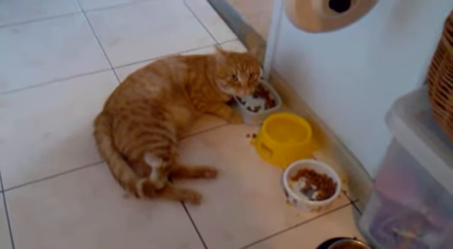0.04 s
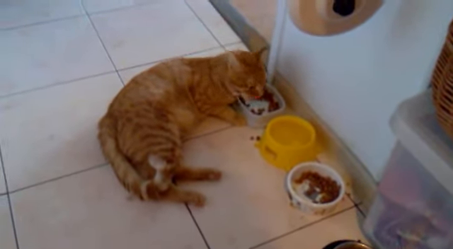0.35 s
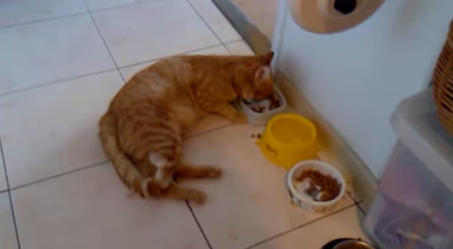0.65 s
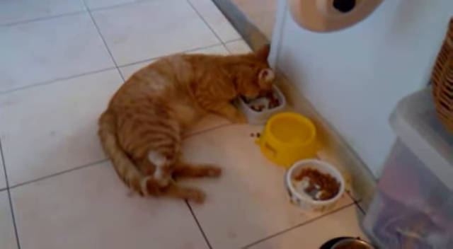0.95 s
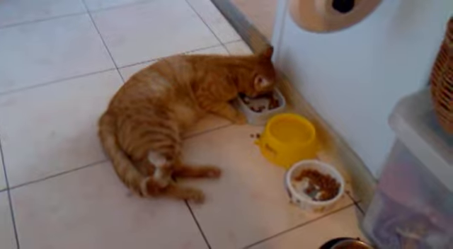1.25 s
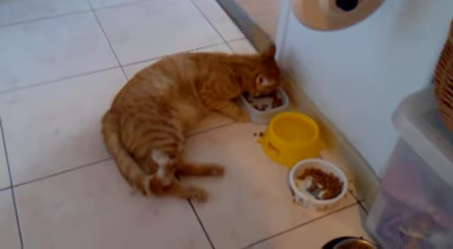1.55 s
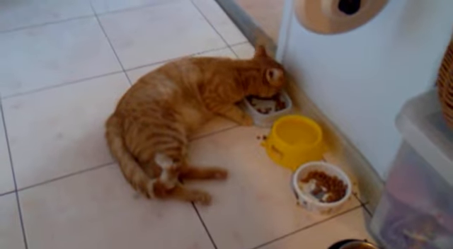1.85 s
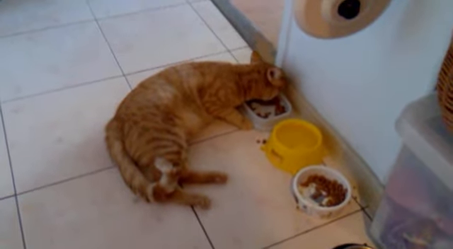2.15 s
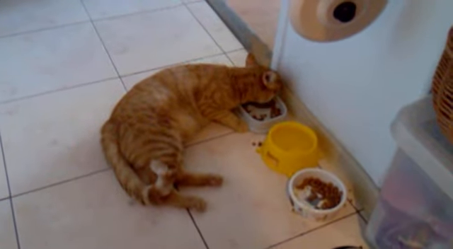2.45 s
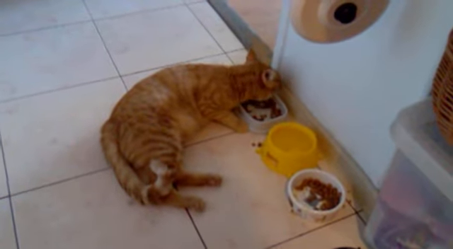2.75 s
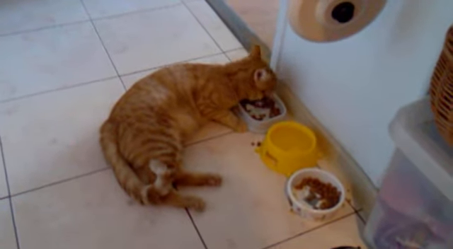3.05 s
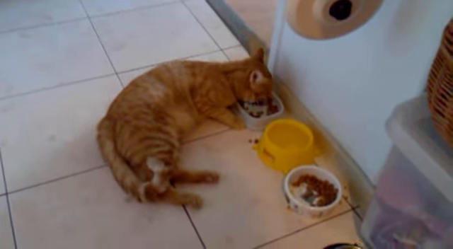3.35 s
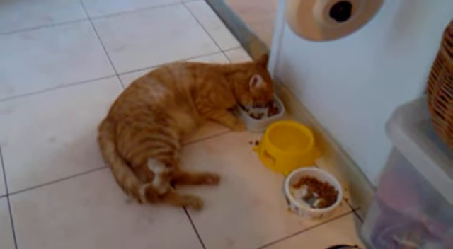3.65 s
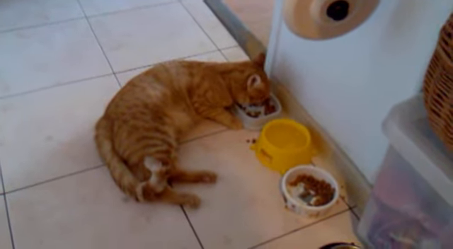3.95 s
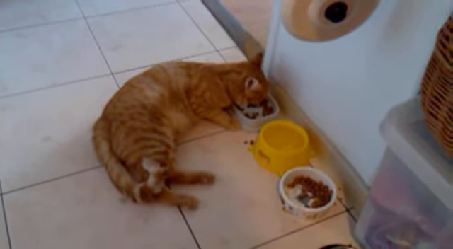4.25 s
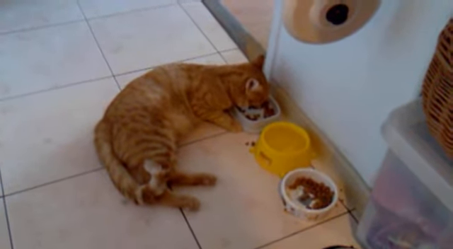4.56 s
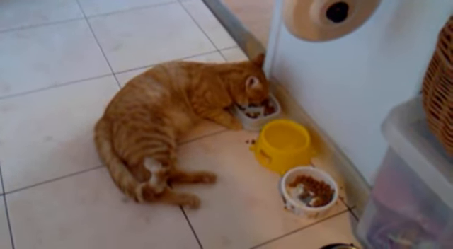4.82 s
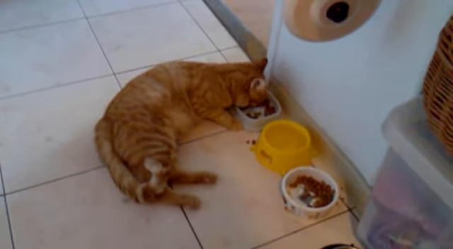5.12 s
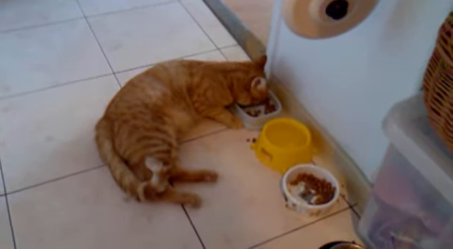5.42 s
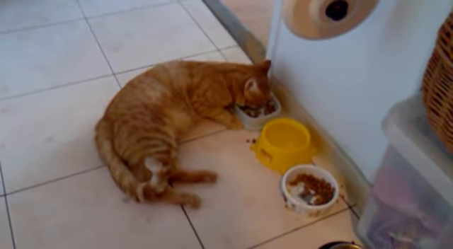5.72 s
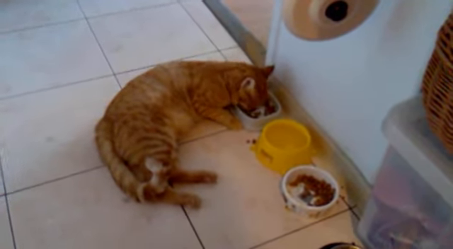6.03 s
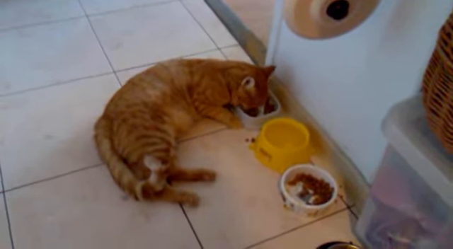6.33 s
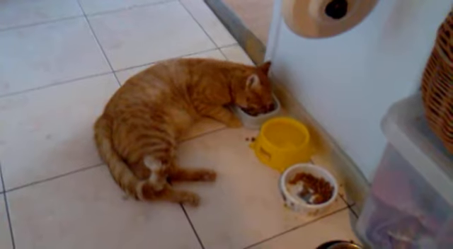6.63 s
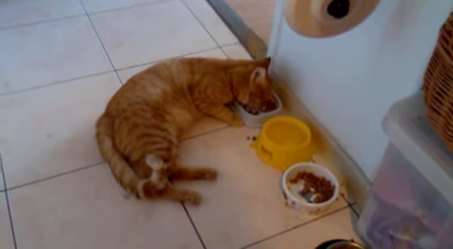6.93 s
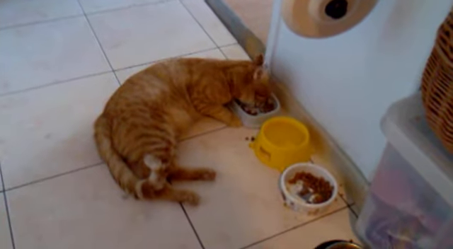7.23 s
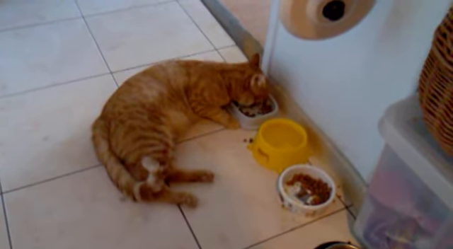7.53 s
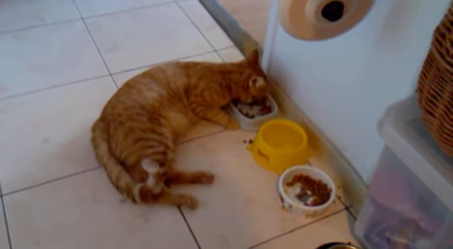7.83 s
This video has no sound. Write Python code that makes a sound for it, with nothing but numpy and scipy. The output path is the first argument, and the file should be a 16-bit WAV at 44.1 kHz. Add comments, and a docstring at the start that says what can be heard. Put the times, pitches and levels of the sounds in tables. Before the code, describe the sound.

Soft hiss and a faint low rumble from a hand-held camera run throughout, in a quiet tiled kitchen. At about 1.5 seconds the hand shifts its grip with a close rustle and a short scraping tick. At 2 seconds one sharp knock with a low thud strikes right at the microphone, by far the loudest sound; it briefly overloads, and the hiss swells and sinks back. Another small scrape follows near 2.7 seconds. From about 3 seconds, a cat a step or two away crunches dry kibble in faint, crisp, irregular ticks, clustered around 3 and 4.5 seconds, each with a short room echo. From 5.5 to 7.4 seconds, light dull tocks of kibble against a plastic bowl mix with more bites. Two thin, high squeaks barely show near 0.3 and 5.5 seconds. Soft handling rustle returns near the end.

```python
"""A tiled kitchen, a hand-held camera a step or two from a cat eating dry food on the floor.
Kibble cracks between its teeth and taps the plastic bowl; the room answers each tick. Up close, the
hand rumbles and rustles on the camera, with two short scraping ticks as it shifts its grip.
Two thin squeaks barely show in the hiss. Once something knocks sharply right at the microphone
and overloads it; the hiss swells and sinks back."""
import sys
import numpy as np
from scipy import signal
from scipy.fft import rfft, irfft
from scipy.io import wavfile
from scipy.ndimage import uniform_filter1d

SR = 44100
rng = np.random.default_rng(int(sys.argv[2]) if len(sys.argv) > 2 else 0)


def bounce(signal):
    """Save signal as a 16-bit WAV file at the path given by the first command-line argument."""
    frames = np.transpose(np.atleast_2d(signal))
    limited = np.clip(frames, -1, 1)
    pcm = np.round(limited * 32767).astype(np.int16)
    wavfile.write(sys.argv[1], SR, pcm)


N = 351962
TIME = np.arange(N) / SR


def amp(db):
    """Decibels to gain."""
    return 10 ** (np.asarray(db) / 20)


def read(table, hz):
    """Interpolates a table on a log-frequency axis."""
    table_hz, value = np.transpose(table)
    return np.interp(np.log(hz + 1), np.log(table_hz + 1), value)


def add(mix, start_s, sound):
    """Mixes a sound in at its start time."""
    part = mix[max(round(start_s * SR), 0):][:len(sound)]
    part += sound[:len(part)]


def noise(colour):
    """Steady noise of one colour, rms 1."""
    hz = np.fft.rfftfreq(N, 1 / SR)
    x = irfft(rfft(rng.standard_normal(N)) * amp(read(colour, hz)), N)
    return x / np.sqrt(np.mean(x ** 2))


def snap(colour, tilt_db=0, size=1024):
    """A click of a given colour, tilted in dB per octave; its envelope peaks at 1."""
    hz = np.fft.rfftfreq(size, 1 / SR)
    db = read(colour, hz) + tilt_db * np.log2(np.clip(hz, 250, 5000) / 1000)
    log_gain = np.log(amp(np.r_[db, db[-2:0:-1]]))
    click = np.fft.ifft(np.exp(np.conj(signal.hilbert(log_gain)))).real  # minimum phase: a sudden start
    return click / abs(signal.hilbert(click)).max()


def mode(hz, cycles, size=1024):
    """One vibration that dies by 60 dB within some cycles."""
    turns = hz * np.arange(size) / SR
    return np.sin(2 * np.pi * turns) * np.exp(-np.log(1000) * turns / cycles)


def push(t, hz, decay_s):
    """A shove of pressure with a small rebound."""
    return -np.sin(2 * np.pi * hz * t) * np.exp(-t / decay_s)


def since_loud(x, threshold=0.25):
    """Seconds since the microphone last came near overload."""
    return TIME - np.maximum.accumulate(np.where(abs(x) > threshold, TIME, -np.inf))


# background hiss: (frequency [Hz], level [dB])
HISS_COLOUR = [(30, -23.5), (110, -6.5), (250, -5.5), (450, -2.5), (630, -5), (1000, -2.5), (1500, -4),
               (2000, -6), (2700, -13), (4200, -15.5), (8000, -16), (15500, -11.5)]
def hiss(mic, rest_db=-67, swell_db=19, sink_s=0.18):
    """The steady background is held down; a loud sound lets it up, and it sinks back."""
    return amp(rest_db + swell_db * np.exp(-since_loud(mic) / sink_s)) * noise(HISS_COLOUR)


def tremor(level_db=-62, wander_db=3, steps_per_s=8):
    """The hand at rest is never quite still: its level wanders at random."""
    wander = np.interp(TIME * steps_per_s, np.arange(256), rng.standard_normal(256))
    return amp(level_db + wander_db * wander)


# the hand shifts its grip: (time [s], length [s], level [dB])
GRIP_SHIFTS = [(1.514, 0.8, -54.5), (2.024, 0.36, -57.5), (2.633, 0.11, -56.5), (3.358, .14, -58.5),
               (6.421, .15, -60), (7.144, .8, -59.5)]
# handling noise, deep rumble and lighter rustle: (frequency [Hz], level [dB])
RUMBLE_COLOUR = [(8, -5), (20, -4.5), (35, -6.5), (52, 2.5), (66, -8), (85, -15.5), (130, -24.5),
                 (250, -29), (600, -51)]
RUSTLE_COLOUR = [(60, 5), (200, -7), (500, -6.5), (1400, -5), (3000, -16), (6000, -24), (10000, -30.5)]
def handling(rumble_db=-1, rustle_db=-10, attack_s=0.13, release_s=0.098):
    """The hand rumbles on the camera throughout; each shift of grip adds rumble and rustle."""
    grip = np.zeros(N)
    for s, length_s, db in GRIP_SHIFTS:
        build_up = np.clip((TIME - s) / attack_s, 0, 1)
        let_go = np.exp(-np.maximum(TIME - s - length_s, 0) / release_s)
        grip += amp(db) * build_up * let_go
    rumble = amp(rumble_db) * np.hypot(tremor(), grip) * noise(RUMBLE_COLOUR)
    return rumble + amp(rustle_db) * grip * noise(RUSTLE_COLOUR)


# faint thin squeaks: (time [s], length [s], pitch [Hz], level [dB])
SQUEAKS = [(0.337, 0.081, 3310, -79), (5.472, 0.082, 3410, -73.5)]
def squeaks(fall=0.03, waver=0.34, octave_db=1):
    """Two wavering partials, an octave apart, slide down a little."""
    out = np.zeros(N)
    for s, length_s, hz, db in SQUEAKS:
        sweep = np.linspace(-1, 1, int(length_s * SR))
        jitter = uniform_filter1d(rng.standard_normal(SR), size=60)[:len(sweep)]
        phase = 2 * np.pi * np.cumsum(hz * (1 - fall * sweep / 2 + waver * jitter)) / SR
        tone = np.sin(phase) + amp(octave_db) * np.sin(2 * phase)
        add(out, s, amp(db) * (1 - sweep ** 2) * tone)
    return out


# a dry, crisp click: (frequency [Hz], level [dB])
CRISP_COLOUR = [(200, -22), (800, -11), (1500, 1.5), (2500, 2.5), (4200, -3.5), (6500, -5.5), (8500, -18.5),
                (15000, -32.5)]
def crackle(level_db=-67, per_s=40, spread_db=3, reach_s=0.17):
    """Tiny stray clicks gather around the grip scrapes and the bites."""
    busy = sum(np.exp(-((TIME - s) / reach_s) ** 2) for s, *_ in SCRAPES_AND_BITES)
    hits = rng.random(N) < np.minimum(busy, 1) * per_s / SR
    sizes = amp(level_db + spread_db * np.minimum(rng.exponential(1, N), 3))
    ticks = signal.oaconvolve(hits * sizes, snap(CRISP_COLOUR))[:N]
    return ticks + 2 * near_walls(ticks)[:N]


def near_walls(x, spread_s=0.01, count=120):
    """Floor, cupboard and walls throw a cluster of early reflections back to the microphone."""
    response = np.zeros(SR)
    delays_s = np.minimum(rng.gamma(2, 1, count) * spread_s + 0.001, 0.5)
    response[(delays_s * SR).astype(int)] = rng.choice([-1, 1], count) / np.sqrt(count)
    return signal.fftconvolve(x, response)


# the tiled room dying away: (frequency [Hz], time to fall 60 dB [s])
KITCHEN_DECAY = [(100, 0.5), (500, 0.46), (1200, 0.32), (3000, 0.22), (7000, 0.12), (15000, 0.54)]
def kitchen_echo(x, rise_s, decay_speed=1):
    """The room's dense tail builds up, then each band dies at its own rate."""
    hz, t, bands = signal.stft(rng.standard_normal(SR), SR, nperseg=256)
    bands *= amp(-60 * decay_speed * t / read(KITCHEN_DECAY, hz)[:, None])
    tail = signal.istft(bands, SR, nperseg=256)[1][:SR]
    tail *= 1 - np.exp(-TIME[:SR] / rise_s)
    return signal.fftconvolve(x, tail / np.linalg.norm(tail))[:N]


def add_tick(mix, start_s, tick, early_db):
    """Each tick gets reflections of its own, as its source keeps moving."""
    add(mix, start_s, tick)
    add(mix, start_s, amp(early_db) * near_walls(tick))


def grit(decay_s=0.00696, per_s=700, strength=0.72, size=4096):
    """One impulse followed by a dying shower of smaller ones."""
    t = TIME[:size]
    shower = rng.choice([-1, 1], size) * (rng.random(size) < per_s / SR)
    return (t == 0) + strength * shower * np.exp(-t / decay_s)


# the hollow under a tick, by name: (resonance [Hz], level over the tick's ring [dB])
HOLLOWS = {"shut mouth": (550, 0), "open mouth": (1480, 2), "bowl": (930, -4.5)}
# Two short scrapes as the hand shifts its grip on the camera (the first two rows, whose hollow name
# only picks a resonance), then kibble breaking in the mouth or bowl:
# (time [s], level [dB], ring pitch [Hz], click boost [dB], hollow [name])
SCRAPES_AND_BITES = [(1.643, -55.5, 2440, 3, "open mouth"), (1.686, -48.5, 2350, -3.5, "open mouth"),
                     (1.742, -50, 2320, -0.5, "bowl"), (2.666, -51.5, 3086, 3.5, "shut mouth"),
                     (2.682, -46, 2890, -2, "shut mouth"), (2.908, -50.5, 2310, -3, "bowl"),
                     (2.9405, -50.5, 3596, -1, "bowl"), (3.162, -46.5, 4033, 1, "bowl"),
                     (3.171, -51.5, 2600, 2, "bowl"), (4.118, -50, 3220, -12, "open mouth"),
                     (4.405, -51, 2930, 0.5, "open mouth"), (4.444, -42.5, 2800, -6, "open mouth"),
                     (4.7376, -49, 2800, -8, "shut mouth"), (4.7953, -52, 2476, -2, "shut mouth"),
                     (5.766, -47, 2330, -10, "bowl"), (6.275, -49, 2950, 1.5, "bowl"),
                     (6.573, -52, 2230, -6, "bowl"), (6.771, -49, 2870, -13, "bowl"),
                     (7.258, -44.5, 2360, -8, "bowl")]
def scrapes_and_bites(ring_db=-6, click_db=1, spread=0.068):
    """The grip scrapes, then kibble splinters: gritty ticks ring at two close pitches over a hollow."""
    out = np.zeros(N)
    for s, db, ring_hz, boost_db, hollow_name in SCRAPES_AND_BITES:
        ring = mode(ring_hz * (1 - spread), cycles=15.4) - mode(ring_hz * (1 + spread), cycles=23)
        hollow_hz, hollow_db = HOLLOWS[hollow_name]
        hollow = amp(hollow_db) * mode(hollow_hz, cycles=12)
        click = amp(click_db + boost_db) * snap(CRISP_COLOUR)
        grain = amp(ring_db) * (ring + hollow) + click
        add_tick(out, s, amp(db) * signal.fftconvolve(grit(), grain), early_db=2)
    return out


# the hand bumps the camera: (time [s], level [dB])
HAND_BUMPS = [(1.688, -43), (1.995, -43), (2.034, -29), (2.073, -25.5), (2.092, -30.5), (3.262, -50),
              (3.492, -48.5)]
def bumps():
    """Each soft bump reaches the microphone as a low thud."""
    out = np.zeros(N)
    for s, db in HAND_BUMPS:
        add(out, s, amp(db) * push(TIME[:SR // 2], hz=110.17, decay_s=0.0044))
    return out


# the camera case ringing: (frequency [Hz], level [dB], time to fall 60 dB [s])
CASE_MODES = [(360, -15, 0.0098), (552, 1.5, .03), (829.4, -10, .02), (1283, -13, 0.021), (1550, -10, .014),
              (2396, -17, .035), (2600, -20.5, 0.02), (2860, -28, .03), (3310, -24.5, 0.046),
              (3560, -26, 0.031), (4170, -27, .03), (4543, -28, .03), (5900, -36.5, .04),
              (7480, -38, 0.071)]
# the crack of a contact: (frequency [Hz], level [dB])
CRACK_COLOUR = [(100, -15.5), (1000, 0), (2500, -1.5), (4200, 0), (5500, -15.5), (8000, -18),
                (13000, -21.5), (16000, -25)]
# contacts right at the microphone: (time [s], ring [dB], crack [dB], push [dB])
CONTACTS = [(1.9915, -56, -40.5, -53), (1.9932, -37.5, -27, -21.5), (2.0125, -2, -13, -9.5),
            (2.0142, -25.5, -14, -26), (2.0171, -22.5, -12.5, -33.5), (2.0215, -29.5, -22.5, -37)]
def knock(crack_s=0.0014, choke_s=0.015):
    """One knock of several quick contacts: each cracks, shoves and rings the case."""
    out, t = np.zeros(N), TIME[:SR // 8]
    ring = sum(amp(db - 60 * t / t60) * np.sin(2 * np.pi * hz * t) for hz, db, t60 in CASE_MODES)
    ring /= 1 + (t / choke_s) ** 4  # the grip chokes the ring
    shove = push(t, hz=88, decay_s=0.0048)
    for s, ring_db, crack_db, push_db in CONTACTS:
        burst = rng.standard_normal(len(t)) * np.exp(-t / crack_s)
        crack = signal.fftconvolve(burst, snap(CRACK_COLOUR))[:len(t)]
        crack /= 2 * np.sqrt(np.sum(crack ** 2) / (crack_s * SR))
        add(out, s, amp(ring_db) * ring + amp(crack_db) * crack + amp(push_db) * shove)
    return out


def sway(level_db=-29, hz=28, decay_s=0.06):
    """The knock leaves the camera swaying."""
    out, t = np.zeros(N), TIME[:SR // 2]
    add(out, CONTACTS[0][0], amp(level_db) * np.sin(2 * np.pi * hz * t) * np.exp(-t / decay_s))
    return out


# the knock as the walls return it: (frequency [Hz], level [dB])
KNOCK_ECHO_COLOUR = [(60, 1), (250, -11), (500, -7), (800, 0), (1400, -1), (2200, -5), (3500, -11.5),
                     (6000, -16.5), (15000, -29)]
def knock_echo(early_db=-24, tail_db=-1):
    """The knock is so close to the microphone that the room's answer stays far below it."""
    cracks = np.zeros(N)
    for s, _, crack_db, _ in CONTACTS:
        add(cracks, s, amp([crack_db]))
    early = near_walls(signal.oaconvolve(cracks, snap(CRACK_COLOUR)))[:N]
    hardest = cracks * (cracks == cracks.max())  # only the hardest contact fills the room
    returned = signal.oaconvolve(hardest, snap(KNOCK_ECHO_COLOUR))
    tail = kitchen_echo(returned, rise_s=0.1, decay_speed=0.77)
    return amp(early_db) * early + amp(tail_db) * tail


def gain_control(mic, duck_db=9, attack_s=0.02, recover_s=0.21):
    """An overload pulls the camera's gain down just too late for itself; the echo then comes back up."""
    wanted_db = duck_db * np.maximum(1 - since_loud(mic) / recover_s, 0)
    lag = np.exp(-1 / (attack_s * SR))
    return amp(-signal.lfilter([1 - lag], [1, -lag], wanted_db))


# a tock on the plastic bowl: (frequency [Hz], level [dB])
BOWL_COLOUR = [(100, -34), (450, -26), (680, -19), (830, -4), (1100, -2.5), (1600, -1.5), (2200, -3),
               (2700, -8), (4200, -8.5), (4700, -20), (8000, -23), (15000, -34)]
# the bowl's wall ringing: (frequency [Hz], level [dB], time to fall 60 dB [cycles])
BOWL_MODES = [(832, -0.5, 26), (964, -2, 16), (1125, -1.5, 23), (1530, -6.5, 31), (2143, -16, 30),
              (2800, -12, 44), (4040, -20, 40)]
# kibble pushed against the bowl: (time [s], level [dB], brightness [dB per octave])
BOWL_TAPS = [(2.681, -46.5, 2.5), (5.44, -58.5, 0), (5.545, -51.5, -7), (5.736, -52.5, -8),
             (5.744, -48.5, -3.5), (5.926, -51, -2.5), (6.163, -49.5, 3), (6.267, -51.5, -5.5),
             (6.33, -40.5, -5), (6.768, -41, -3.2), (6.793, -49, -5), (7.178, -48, -8), (7.258, -48, 3),
             (7.324, -53, -2), (7.358, -55, -6)]
def bowl_taps(gain_db=1, ring_db=-4):
    """Short dull tocks from down on the floor: the plastic wall is struck and swings briefly."""
    out = np.zeros(N)
    ring = sum((-1) ** k * amp(db) * mode(hz, cycles, size=2048)
               for k, (hz, db, cycles) in enumerate(BOWL_MODES))
    for s, db, tilt_db in BOWL_TAPS:
        add_tick(out, s, amp(db) * snap(BOWL_COLOUR, tilt_db), early_db=7.5)
        add_tick(out, s, amp(db + ring_db) * ring, early_db=-1.5)
    return amp(gain_db) * out


def scene(tick_echo_db=-7):
    """At the one microphone: the cat a step or two off, the room around, knock and hand up close."""
    ticks = scrapes_and_bites() + bowl_taps() + crackle()
    room = knock_echo() + amp(tick_echo_db) * kitchen_echo(ticks, rise_s=0.018)
    camera = knock() + sway() + handling() + bumps()
    return (ticks + room + camera + squeaks())[None]


def record(dry, ceiling=0.73, band_edge_hz=15800):
    """In the camera: gain control, background hiss, microphone overload and the band limit."""
    mic = dry[0]
    x = mic * gain_control(mic) + hiss(mic)
    clipped = x / (1 + (x / ceiling) ** 6) ** (1 / 6)
    lowpass = signal.firwin(511, band_edge_hz, window=("kaiser", 9), fs=SR)
    return signal.oaconvolve(clipped, lowpass, "same")[None]


dry = scene()
out = record(dry)
bounce(out)
```